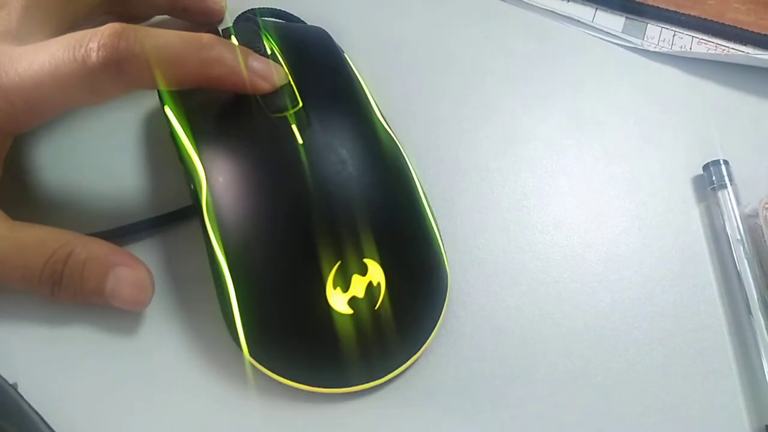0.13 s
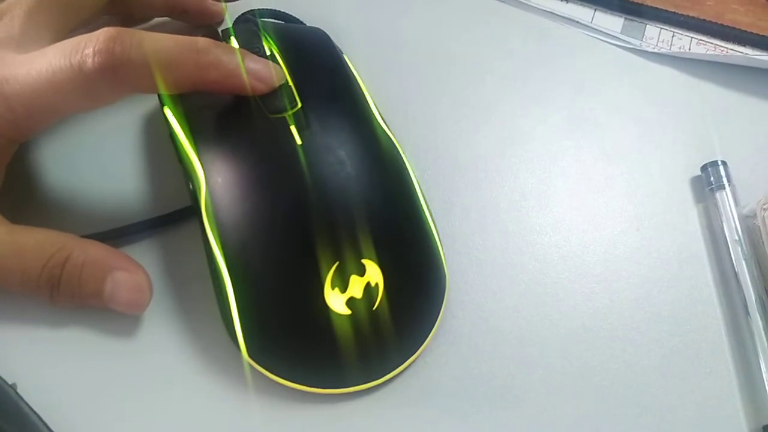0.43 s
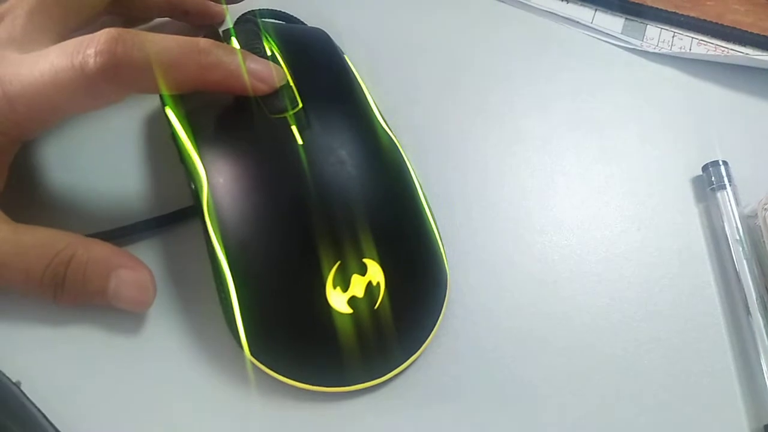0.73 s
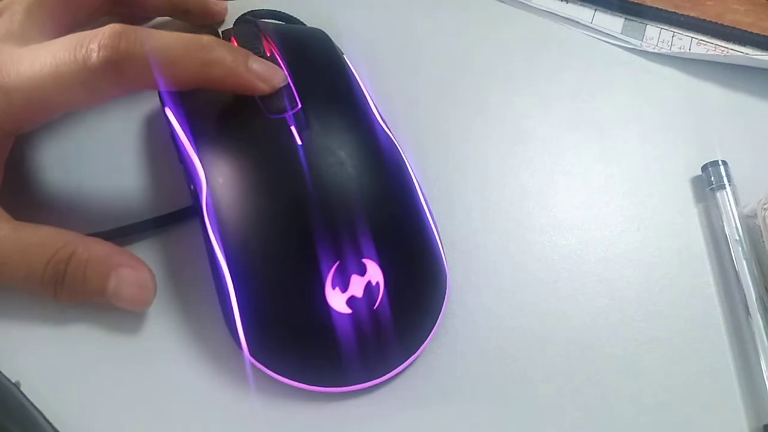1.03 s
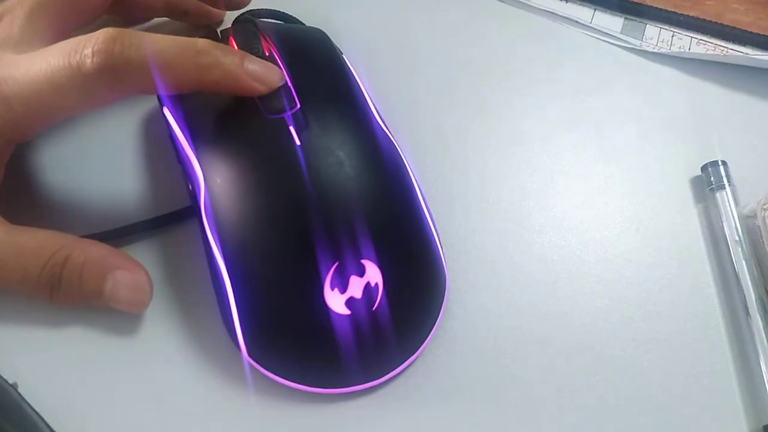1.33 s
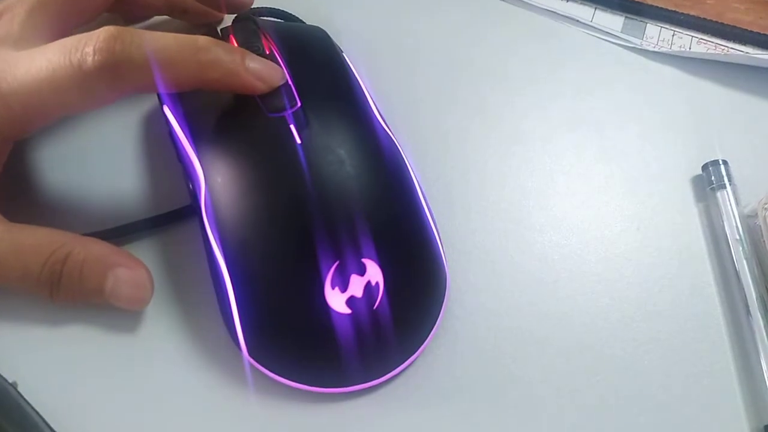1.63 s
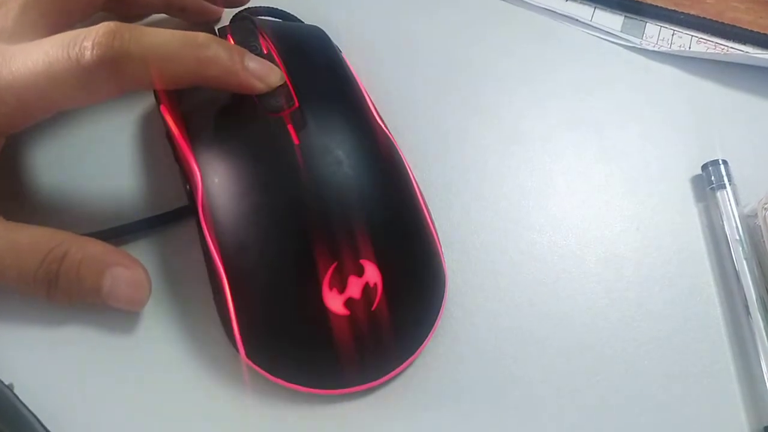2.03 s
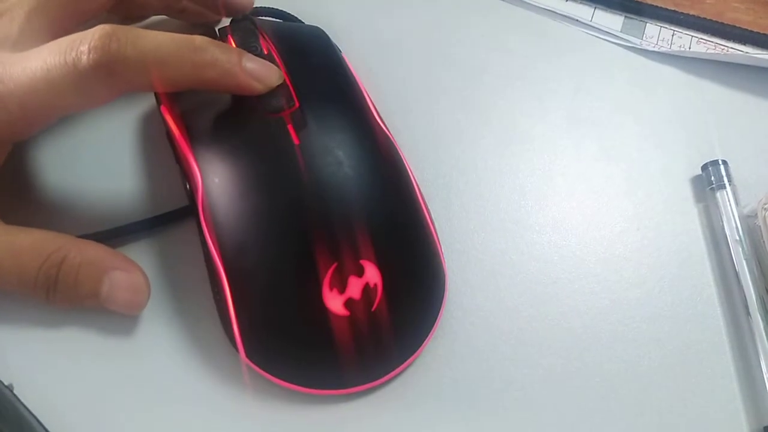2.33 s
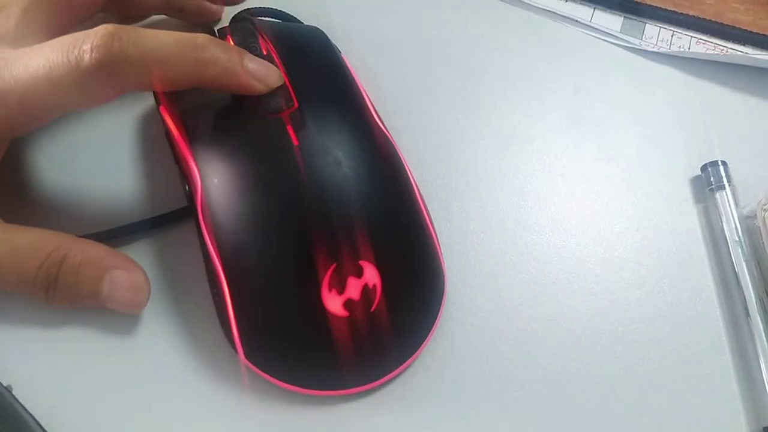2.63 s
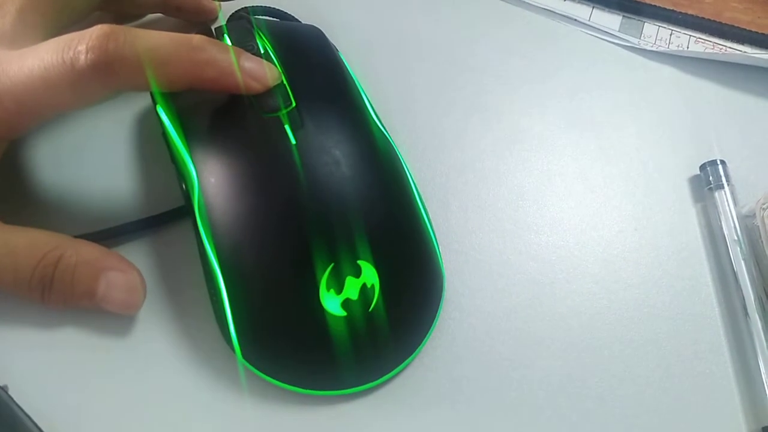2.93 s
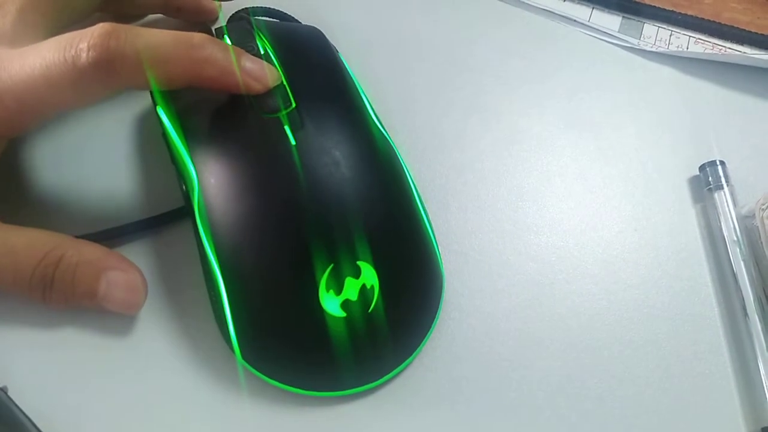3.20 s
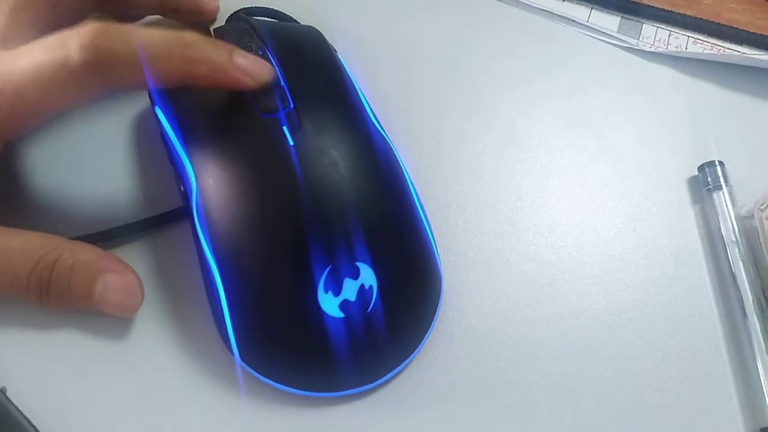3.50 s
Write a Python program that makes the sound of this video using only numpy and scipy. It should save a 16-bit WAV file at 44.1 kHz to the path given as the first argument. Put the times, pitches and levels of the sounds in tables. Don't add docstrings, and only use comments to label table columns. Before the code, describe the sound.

Five slow mouse clicks, each a crisp press snap then a slightly stronger release snap, the last two pairs closer together; close microphone, quiet room with steady fan, mains hum and faint broken hiss.

```python
import sys
import numpy as np
from scipy import signal
from scipy.io import wavfile
from scipy.ndimage import uniform_filter1d

SR = 44100
rng = np.random.default_rng(int(sys.argv[2]) if len(sys.argv) > 2 else 0)


def invert_db(x):
    u = np.asarray(x, float) / 20
    return 10 ** u


def to_wav(s):
    ch = np.atleast_2d(s).T
    pcm = np.round(np.clip(ch, -1, 1) * 32767)
    wavfile.write(sys.argv[1], SR, pcm.astype(np.int16))


N = 161406

# (frequency [Hz], correlation [0-1])
PORT_LIKENESS = [(30, .995), (150, 0.91), (300, 0.84), (550, 0.24), (800, 0.19), (1400, 0.047),
                 (6000, 0.19)]
# (frequency [Hz], level [dB])
PORT_LEAN = [(30, 1), (60, 4), (200, 4), (500, 1.5), (1300, -0.5), (2400, 0), (4300, -9.5), (8000, -19)]
# (frequency [Hz], density [dB per Hz])
RUMBLE = [(25, -54), (42, -27), (62, -1.5), (130, -3), (220, -9.5), (300, -8.5), (370, -14.5), (450, -9.5)]
# (frequency [Hz], density [dB per Hz])
RUSH = [(450, 0), (730, -7.5), (800, -1.5), (1500, -9.5), (1850, -17.5), (2080, -10), (2250, -30.5),
        (2500, -43)]
# (frequency [Hz], density [dB per Hz])
HISS = [(2300, 2), (2900, 9), (3350, 0), (4000, -2.5), (5700, 0.5), (6800, -6.5), (7800, -7),
        (10500, -23.5)]
# (time [s], level [dB])
RUB = [(0, 0), (.3, 1), (.45, 5), (.65, 2.5), (.8, 1.5), (.95, -2.5), (1.3, 0), (1.42, -4), (1.55, 0),
       (1.7, 1.5), (1.85, -4), (2.1, 3.5), (2.45, 0.5), (2.6, 0.5), (2.85, 0), (3.1, 1), (3.4, 0),
       (3.66, -4.5)]
# (multiple of shaft speed [count], rms level [dB])
FAN_ORDERS = [(5, -65), (10, -61.5), (16, -59), (39, -58), (41, -59), (49, -58), (50, -51), (52, -61),
              (54, -56), (55, -60.5), (57, -60.5), (66, -59), (80, -65.5), (110, -68.5)]
# (frequency [Hz], rms level [dB])
HUM = [(100, -47.5), (200, -72.5), (300.3, -56), (401, -59)]
# (time [s], width [s], level [dB])
PASSING = (2.5, .3, -51)
# (time [s], length [s], start pitch [Hz], end pitch [Hz], level [dB])
WHINES = [(.04, .17, 12800, 11800, -74), (.03, .2, 14000, 13900, -74), (.16, .08, 11150, 11350, -72),
          (.27, .15, 13350, 14000, -71), (.38, .13, 13050, 13400, -69), (.42, .07, 12400, 12450, -75),
          (.36, .17, 11400, 11400, -74), (.485, .11, 13150, 12850, -64), (.57, .14, 12950, 12950, -75),
          (.6, .15, 12050, 12100, -76), (.69, .07, 13100, 13050, -68), (.77, .1, 12850, 12900, -73),
          (.75, .14, 11900, 11950, -73), (.84, .08, 11600, 11000, -71), (.87, .1, 11900, 11400, -75)]
# (frequency [Hz], level [dB], t60 [s])
SPRING = [(7660, -49.5, 0.81), (9200, -58.5, .4)]

# (frequency [Hz], level [dB])
TAIL_COLOUR = [(1500, 9), (3000, 7.5), (3400, -4), (3900, 5.5), (7500, 3), (9500, -2), (13900, -9),
               (14600, -29)]
# (frequency [Hz], t60 [s])
TAIL_T60 = [(2000, 0.27), (5000, 0.47), (8000, 0.55), (14000, 0.51)]
# (frequency [Hz], level [dB])
TAIL_FAR = [(2000, 1), (4000, -10.5), (8000, -9.5), (14000, -43)]
# (frequency [Hz], level [dB])
SHADOW = [(1500, -4), (3000, -8), (4500, -17), (6000, -14), (8000, -20), (11000, -19), (14000, -18)]

# (time [s], snap level [dB], room tail level [dB])
PRESSES = [
    (.0004, -35.5, -50),
    (.9980, -34, -54),
    (1.958, -34, -55.5),
    (2.6706, -34.5, -54),
    (3.242, -34.5, -53.5),
]
# (time [s], snap level [dB], room tail level [dB])
RELEASES = [
    (0.2421, -32, -53),
    (1.2499, -32.5, -52.5),
    (2.2210, -32, -52.5),
    (2.9164, -32.5, -51.5),
    (3.4324, -31.5, -52.5),
]
# (time [s], snap level [dB], room tail level [dB])
TICKS = [
    (3.098, -71, -89),
    (3.150, -74, -69),
    (3.5362, -52.5, -85),
    (3.612, -76, -86),
]
# (time [s], snap level [dB], room tail level [dB])
DESK_TAPS = [
    (.155, -51.5, -61),
]
# (frequency [Hz], level [dB], t60 [s])
PRESS_MODES = [(7470, -7, .03), (3850, -4, .04), (4530, -1, .035), (5070, -1, .03), (5960, -6, .03),
               (6600, -5, .03), (5400, -7, .02), (8080, -2, .05), (8750, 1, .016), (9400, -1, .016),
               (10650, -2, .012), (11800, -12, .015), (12850, -14, .025), (14150, -16, .03)]
# (frequency [Hz], level [dB], t60 [s])
RELEASE_MODES = [(3880, -4, .03), (4520, -4, .03), (5250, -6, .02), (5960, -3, .025), (6700, -8, .02),
                 (7350, 4, .07), (8500, -2, .015), (9400, -2, .012), (10000, 4, .014), (11230, 1, .03),
                 (11800, -8, .02), (12400, -14, .015), (14050, -17, .02)]
# (frequency [Hz], level [dB], t60 [s])
LEAF_MODES = [(11200, 4, 0.028), (7750, 0, .08), (2746, -12.5, 0.092)]
# (frequency [Hz], level [dB], t60 [s])
DESK_MODES = [(1745, 3.5, 0.014), (2340, -10, 0.02), (2540, 2.5, 0.027), (2920, -3.5, 0.055)]
# (delay [s], level [dB])
PRESS_BOUNCES = [
    (0, 0),
    (.0011, -6),
    (.0018, -11),
]
# (delay [s], level [dB])
RELEASE_BOUNCES = [
    (0, 0),
    (.0020, -6),
]
ONE_CONTACT = PRESS_BOUNCES[:1]

# (frequency [Hz], level per bin [dB])
GATE = [(1500, -110), (2300, -97), (3000, -92), (3350, -83), (3750, -90), (8000, -86), (10000, -91),
        (14000, -95)]


def evened(x):
    return x / np.sqrt(np.mean(abs(x) ** 2) + 1e-20)


def read(points, hz):
    f, value = np.transpose(points)
    return np.interp(np.log(hz + 1), np.log(f + 1), value, left=value[0], right=value[-1])


def ports(far_db, near_db=0):
    return invert_db(np.array([[far_db], [near_db]]))


def add(mix, s, sound):
    part = mix[:, max(round(s * SR), 0):][:, :sound.shape[1]]
    part += sound[:, :part.shape[1]]


def blobs(frames, bins, wide, long):
    field = rng.standard_normal((frames, bins)).T
    for _ in range(2):
        field = uniform_filter1d(field, wide, 0)
        field = uniform_filter1d(field, long, 1)
    return evened(field)


def air(colour, size, patchy_db):
    frames, hz = N // (size // 4) + 5, np.fft.rfftfreq(size, 1 / SR)
    a, b, c, d = rng.standard_normal((frames, len(hz), 4)).T
    same = np.clip(read(PORT_LIKENESS, hz), -1, 1)[:, None]
    left = a + 1j * b
    right = same * left + np.sqrt(1 - same ** 2) * (c + 1j * d)
    lean = read(PORT_LEAN, hz)[:, None] / 2
    inside = ((hz >= colour[0][0]) & (hz < colour[-1][0]))[:, None]
    patch = patchy_db * blobs(frames, len(hz), wide=3, long=30)
    level_db = read(colour, hz)[:, None] + np.array([lean, -lean]) + patch
    z = np.array([left, right]) * inside * invert_db(level_db)
    x = signal.istft(z, nperseg=size, noverlap=size - size // 4)[1][:, :N]
    return x / np.sqrt(np.mean(x.mean(0) ** 2))


def rumble():
    return invert_db(-43) * air(RUMBLE, size=4096, patchy_db=0.5)


def passing():
    s, width, db = PASSING
    band = signal.butter(2, (42, 62), "bandpass", fs=SR, output="sos")
    low = evened(signal.sosfilt(band, rng.standard_normal(N)))
    swell = np.exp(-((np.arange(N) / SR - s) / width) ** 2)
    return ports(db + 1, db - 1) * low * swell


def fan_and_hum():
    fan_hz = 16.005
    t, out = np.arange(N) / SR, np.zeros((2, N))
    for hz, db in [(round(order) * fan_hz, db) for order, db in FAN_ORDERS] + HUM:
        p = rng.random(6) * 2 * np.pi
        sway = sum(np.sin(2 * np.pi * f * t + q) for f, q in zip((0.482, 1.24, 2.936, 5.1), p))
        lag = (1 - np.clip(read(PORT_LIKENESS, hz), 0, 1)) * 2.14
        for k, side in enumerate((1, -1)):
            level = invert_db(db + 2.5 + side * read(PORT_LEAN, hz) / 2 + 0.97 * sway)
            out[k] += level * np.sin(2 * np.pi * hz * t + p[4] + 0.3 * sway + side * lag / 2)
    return out


def air_rush():
    return invert_db(-50.5) * air(RUSH, size=2048, patchy_db=2.0)


def hiss():
    rub_db = np.interp(np.arange(N) / SR, *np.transpose(RUB))
    return invert_db(-69 + rub_db) * air(HISS, size=1024, patchy_db=5.5)


def whine():
    fuzz_db, arch_hz = -6, 170
    out = np.zeros((2, N))
    for s, length, from_hz, to_hz, db in WHINES:
        u = np.arange(0, 1, 1 / (length * SR))
        arch = np.sin(np.pi * u)
        hz = from_hz + (to_hz - from_hz) * u + arch_hz * arch
        fuzz = uniform_filter1d(rng.standard_normal(len(u)), size=45)
        fuzz = evened(uniform_filter1d(fuzz, size=30))
        swell = (arch + invert_db(fuzz_db) * fuzz) * arch ** 0.33
        add(out, s, ports(db - 19, db) * swell * np.sin(2 * np.pi * np.cumsum(hz) / SR))
    return out


def spring():
    t = np.arange(N) / SR
    wobble = 0.84 + 0.71 * evened(uniform_filter1d(rng.standard_normal(N), size=90))
    ring = sum(invert_db(db - 60 * t / t60) * np.sin(2 * np.pi * hz * t) for hz, db, t60 in SPRING)
    return ring * wobble * ports(-20)


def room_tail(db):
    bend, rise_s = 1.29, 0.0016
    hz, t, z = signal.stft(rng.standard_normal((2, SR // 2)), SR, nperseg=256)
    fall_db = -60 * (t / read(TAIL_T60, hz)[:, None]) ** bend
    z = z * invert_db(read(TAIL_COLOUR, hz)[:, None] + fall_db) * (hz > 1200)[:, None]
    z[0] *= invert_db(read(TAIL_FAR, hz))[:, None]
    x = signal.istft(z, SR, nperseg=256)[1]
    return invert_db(db) * x * np.clip(np.arange(x.shape[1]) / SR / rise_s, 0, 1)


def finger_damping(t, hold_s):
    damp_s, damped_db, settle_s, settled_db = .0006, -13, .0085, -12
    choke_db = damped_db / (1 + np.exp(-(t - hold_s) / damp_s * 2))
    settle_db = settled_db / (1 + np.exp(-(t - settle_s) / damp_s))
    return invert_db(choke_db + settle_db)


def contact_crack(t, bounces, band):
    crack = evened(signal.sosfilt(band, rng.standard_normal((2, len(t))))) * np.exp(-t / 0.00025)
    out = np.zeros((2, len(t)))
    for late, hit_db in bounces:
        add(out, late, invert_db(hit_db) * crack)
    return out


def mode_ring(t, modes, bounces, turns):
    far_delay_s, vary_db, rise_turns = 0.000435, 1.1, 1.1
    vary, ring = rng.standard_normal(len(modes)), np.zeros((2, len(t)))
    for m, (hz, mode_db, t60) in enumerate(modes):
        pitch_hz = hz * (1 + 0.0036 * vary[m])
        paths = (far_delay_s, read(SHADOW, hz)), (0, 0)
        for (late, hit_db), turn in zip(bounces, turns[m]):
            for k, (lag, loss_db) in enumerate(paths):
                u = np.maximum(t - late - lag, 0)
                rise = 1 - np.exp(-u * hz / rise_turns)
                fall = invert_db(mode_db + hit_db + loss_db + vary_db * vary[m] - 60 * u / t60)
                ring[k] += rise * fall * np.sin(2 * np.pi * pitch_hz * u + turn[k])
    return ring / np.sqrt(np.mean(ring[1, :180] ** 2))


def leaf_creep(band):
    before_s = (np.arange(500) - 500) / SR
    return evened(signal.sosfilt(band, rng.standard_normal(500))) * np.exp(before_s / 0.0046)


def snaps(events, modes, bounces, hold_s, crack_db=-99):
    creep_db = -20
    out, t = np.zeros((2, N)), np.arange(1800) / SR
    turns = rng.random((len(modes), len(bounces), 2)) * 2 * np.pi
    damp = finger_damping(t, hold_s)
    band = signal.butter(3, (3600, 12500), "bandpass", fs=SR, output="sos")
    crack = contact_crack(t, bounces, band) * ports(crack_db - 19, crack_db)
    for s, db, tail_db in events:
        ring = mode_ring(t, modes, bounces, turns)
        add(out, s, invert_db(db) * damp * (crack + ring))
        add(out, s, room_tail(tail_db))
        creep = leaf_creep(band)
        if s > 500 / SR:
            near_db = db + crack_db + creep_db
            add(out, s - 500 / SR, ports(near_db - 16, near_db) * creep)
    return out


def desk_knocks():
    knocks = [(s, db - 15, -120) for s, db, _ in PRESSES + RELEASES]
    return snaps(knocks + DESK_TAPS, DESK_MODES, ONE_CONTACT, hold_s=.0041)


def fingertip_ticks():
    return snaps(TICKS, PRESS_MODES[4:10], ONE_CONTACT, hold_s=0.0043, crack_db=-9)


def button():
    leaves = [(s, db - 8, -120) for s, db, _ in RELEASES]
    down = snaps(PRESSES, PRESS_MODES, PRESS_BOUNCES, hold_s=.0041, crack_db=-1)
    up = snaps(RELEASES, RELEASE_MODES, RELEASE_BOUNCES, hold_s=.0042, crack_db=-1)
    return down + up + snaps(leaves, LEAF_MODES, ONE_CONTACT, hold_s=0.0069)


def scene():
    room = rumble() + passing() + fan_and_hum() + air_rush() + hiss()
    small_rings = whine() + spring()
    return room + small_rings + desk_knocks() + fingertip_ticks() + button()


def gate(x):
    shut_db, wander_db, soft_db, far_db = -40, 6, .6, -1
    self_noise_db, self_patch_db, self_top_hz, mask_db = -110, 7, 14300, -30
    hz, t, z = signal.stft(x, SR, nperseg=512, noverlap=384)
    recent = uniform_filter1d(abs(z) ** 2, size=3, axis=1)
    recent = signal.lfilter([.15], [1, -.85], recent, axis=2)
    wander = np.array([blobs(len(t), len(hz), wide=2, long=24) for _ in x])
    limit_db = read(GATE, hz)[:, None] + np.array([far_db, 0])[:, None, None] + wander_db * wander
    over = np.clip((10 * np.log10(recent + 1e-20) - limit_db) / soft_db, -30, 30)
    a, b = rng.standard_normal(z.shape[::-1] + (2,)).T
    patch = np.array([blobs(len(t), len(hz), wide=2, long=22) for _ in x])
    own_db = self_noise_db + self_patch_db * np.minimum(patch, .4) - 14 * (patch < -.6)
    own = (a + 1j * b) * invert_db(own_db) * (hz < self_top_hz)[:, None]
    busy = uniform_filter1d(1 / (1 + np.exp(-over)), size=31, axis=1)
    busy = uniform_filter1d(busy, size=15, axis=2)
    own = own * invert_db(mask_db * np.minimum(2 * busy, 1))
    gated = z * invert_db(shut_db / (1 + np.exp(over)))
    return signal.istft(gated + own, SR, nperseg=512, noverlap=384)[1][:, :N]


def roll_off(x):
    return signal.sosfilt(signal.butter(12, 15600, fs=SR, output="sos"), x)


def record(dry):
    top = signal.butter(12, 14450, fs=SR, output="sos")
    mix = gate(signal.sosfilt(top, dry))
    return roll_off(mix)


dry = scene()
out = record(dry)
to_wav(out)
```